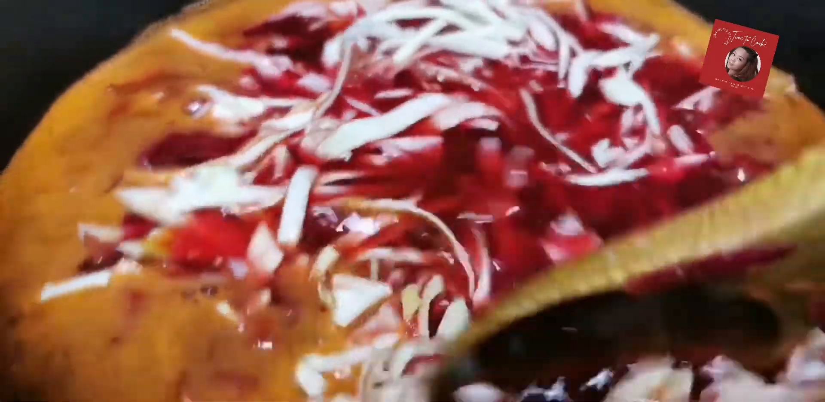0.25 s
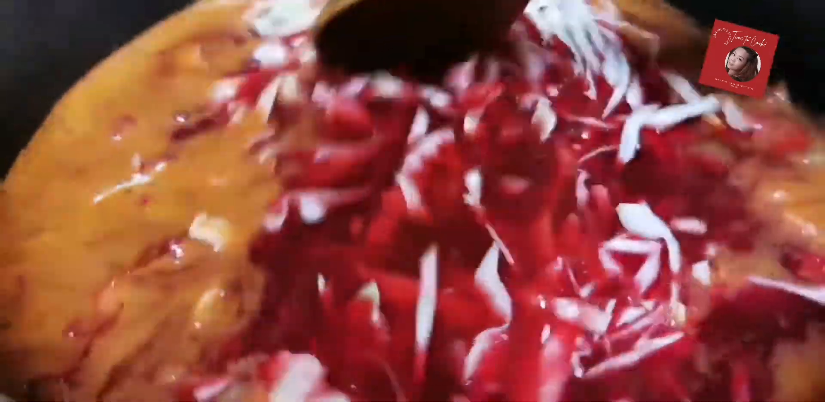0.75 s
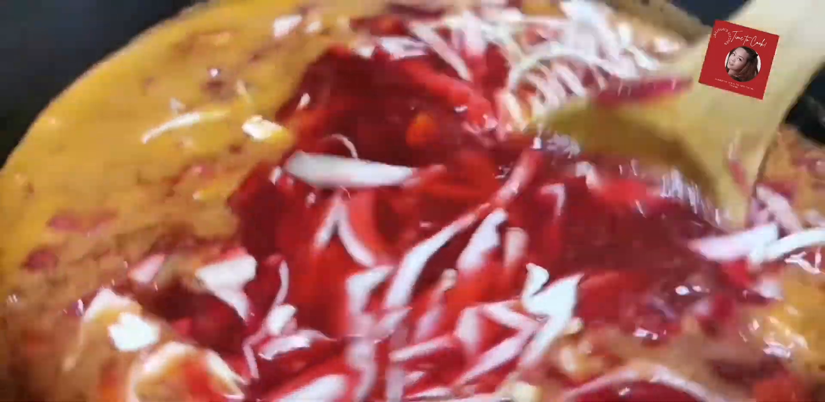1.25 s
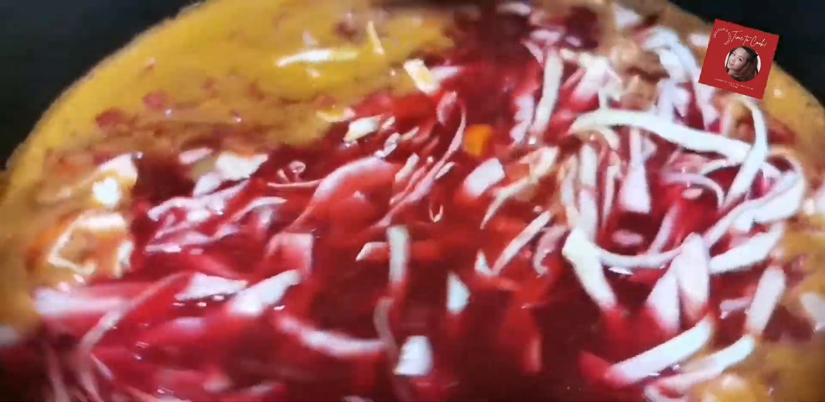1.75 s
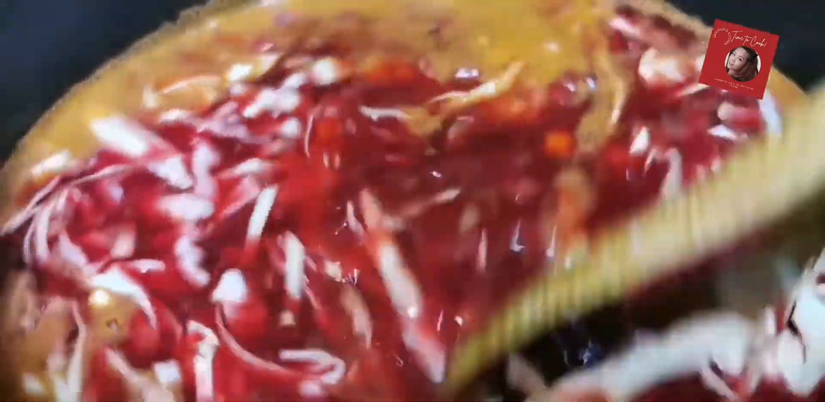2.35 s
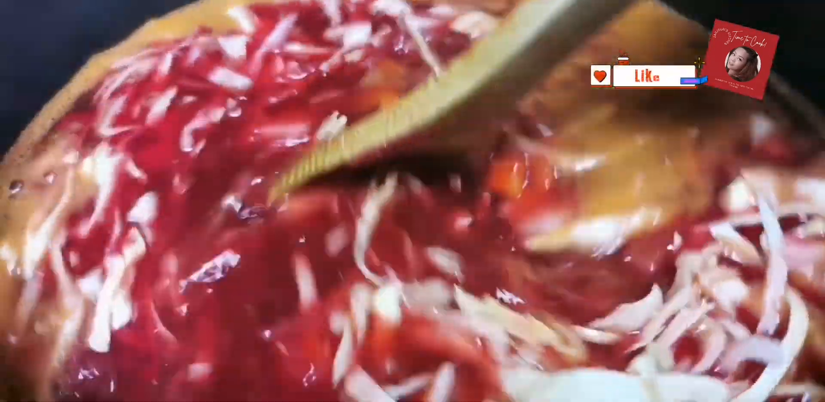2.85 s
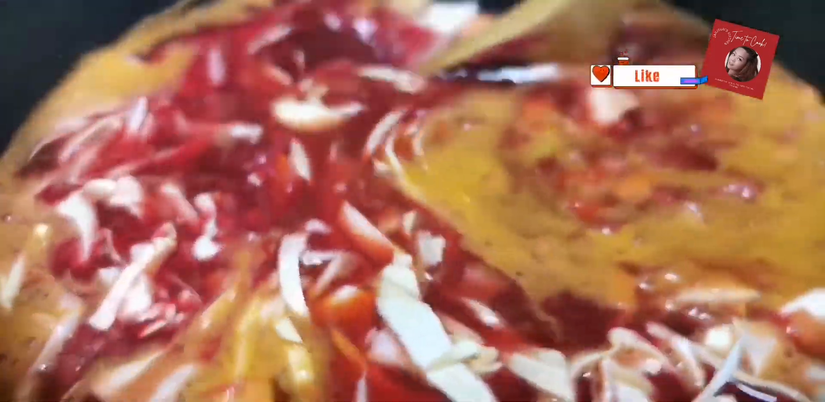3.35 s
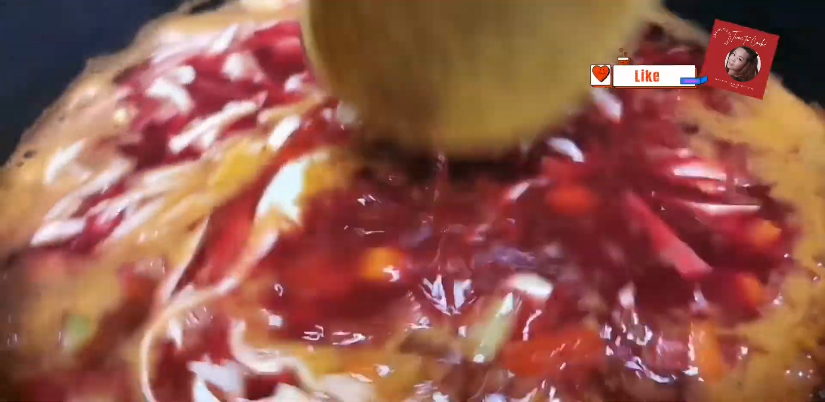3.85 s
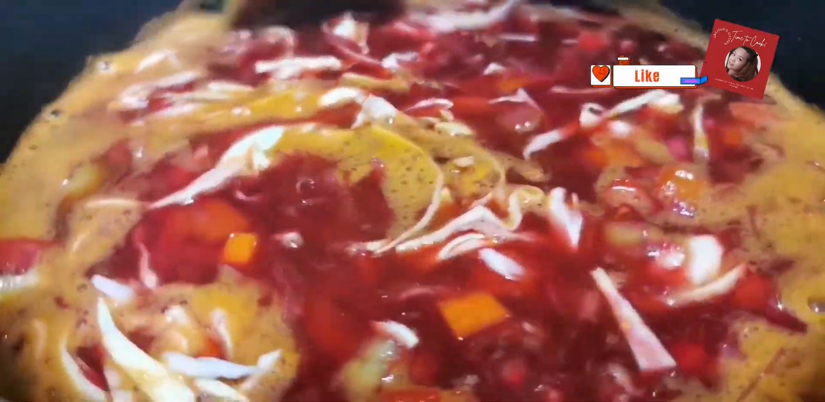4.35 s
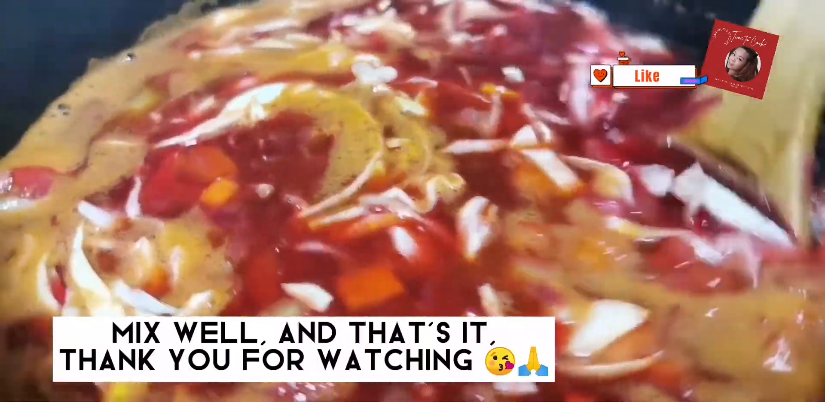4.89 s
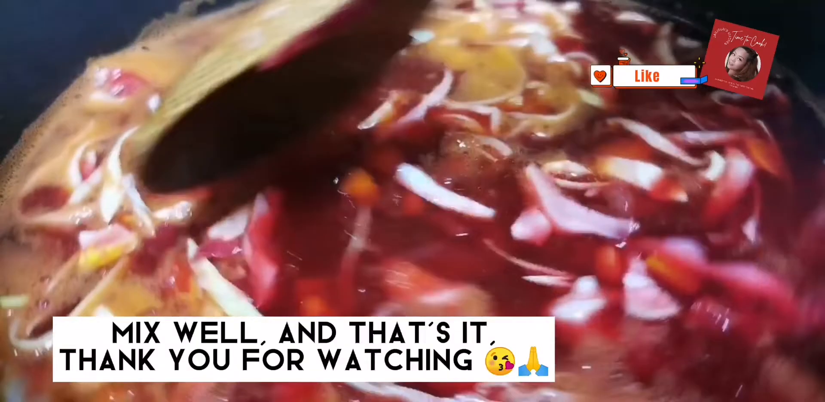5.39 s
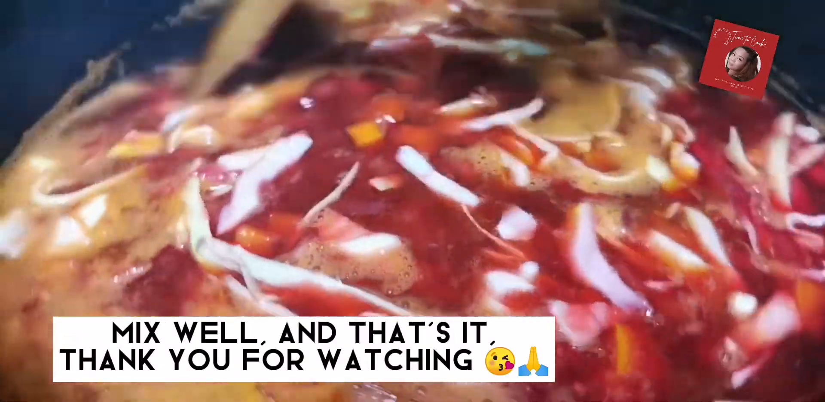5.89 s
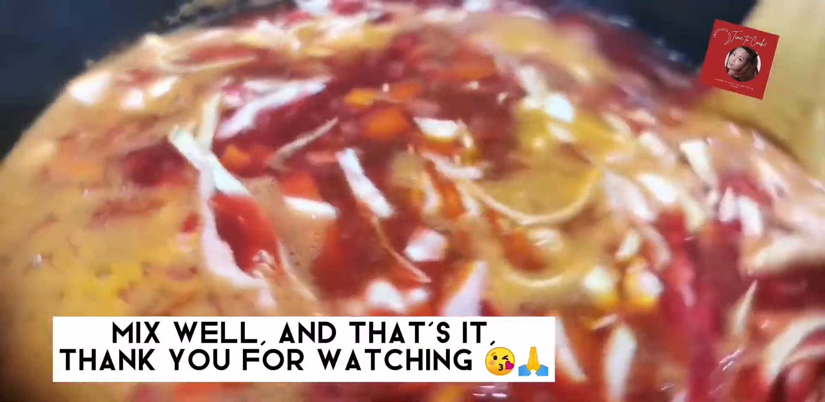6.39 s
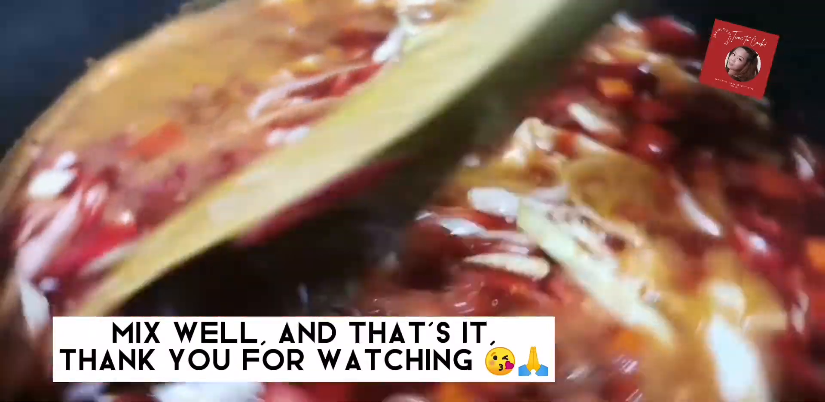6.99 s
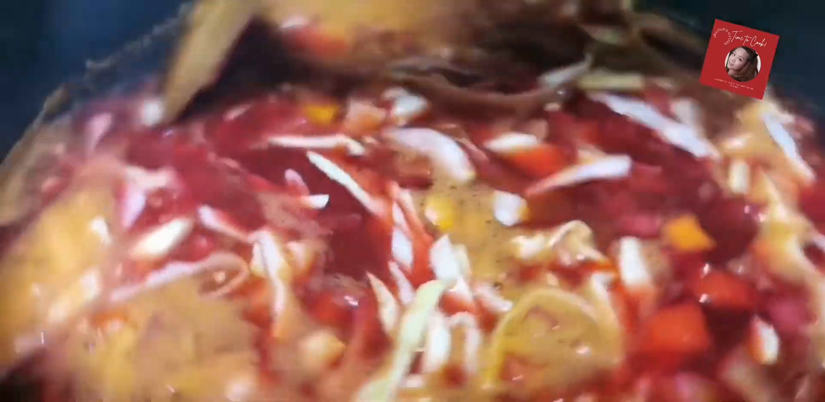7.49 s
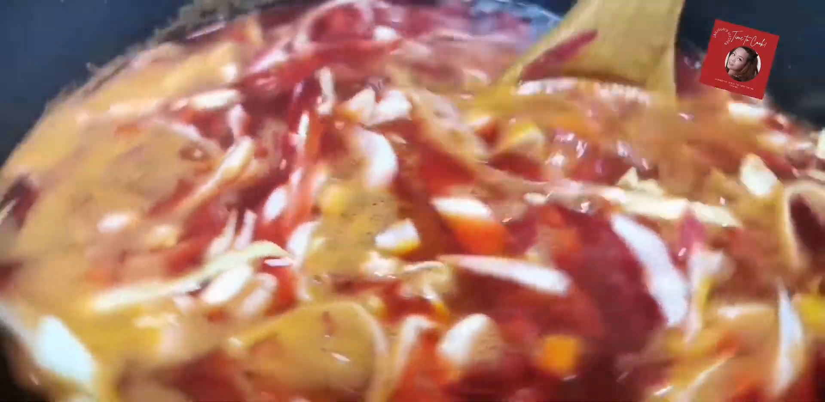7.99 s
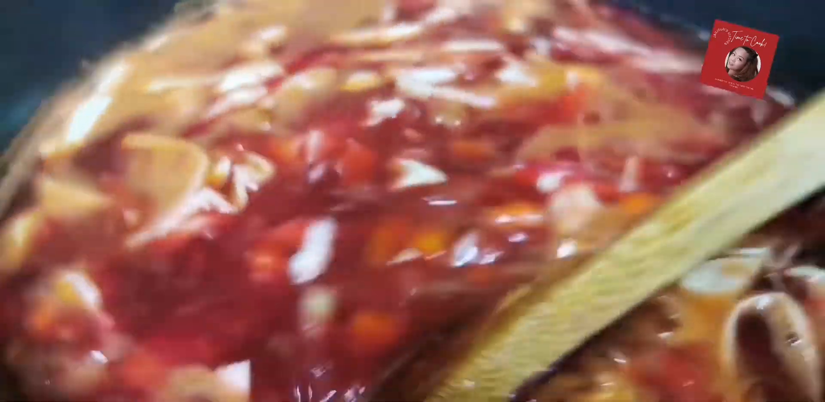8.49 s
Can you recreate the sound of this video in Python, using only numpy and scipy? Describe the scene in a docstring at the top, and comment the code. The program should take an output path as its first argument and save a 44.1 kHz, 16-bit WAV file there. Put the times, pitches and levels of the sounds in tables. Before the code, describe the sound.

Thick soup bubbles low and spits lightly while a wooden spoon stirs it, with dull knocks and short scrapes against the pot.

```python
"""A kitchen stove, close up: a wooden spoon stirs a pot of thick, simmering soup.
The spoon knocks on the pot, drags over its bottom and taps the wall; the soup damps the metal.
Steam bubbles wobble deep down and spit at the surface, the stirred soup heaves, and vegetables
crackle as they are pushed under. One light clink sounds, over a steady hiss with a faint whine."""
import sys
import numpy as np
from scipy import signal
from scipy.fft import rfft, irfft, next_fast_len
from scipy.io import wavfile
from scipy.ndimage import map_coordinates

SR = 44100
rng = np.random.default_rng(int(sys.argv[2]) if len(sys.argv) > 2 else 0)


def waveform_to_disk(signal):
    """Save audio, clipped to [-1, 1], as 16-bit WAV at the path in sys.argv[1]."""
    frames = np.transpose(np.atleast_2d(signal))
    scaled = np.clip(frames, -1, 1) * 32767
    samples = np.round(scaled).astype(np.int16)
    wavfile.write(sys.argv[1], SR, samples)


N = 385424
TOP_HZ = 15600


def amp(db):
    return 10 ** (np.asarray(db) / 20)


def unit_rms(x):
    return x / np.sqrt(np.mean(x ** 2) + 1e-20)


def curve_at(points, hz):
    """Read a (Hz, value) curve on a log frequency axis."""
    freqs, values = np.transpose(points)
    return np.interp(np.log(hz + 1), np.log(freqs), values)


def wobble(rate, size=N):
    """A smooth random curve, rate knots a second."""
    return map_coordinates(rng.standard_normal(int(size * rate / SR) + 4), [np.arange(size) * rate / SR])


def fade(t, t60):
    """Fall by 60 dB every t60 seconds."""
    return np.exp(-np.log(1000) * t / t60)


def add(track, start, sound):
    """Mix a sound in at start seconds."""
    span = track[max(round(start * SR), 0):][:len(sound)]
    span += sound[:len(span)]


def coloured(x, spectrum):
    """x through a (Hz, dB) spectrum, at rms 1."""
    size = next_fast_len(N + SR // 2)
    gain = amp(curve_at(spectrum, np.fft.rfftfreq(size, 1 / SR)))
    return unit_rms(irfft(rfft(x, size) * gain, size)[:N])


def pulse(spectrum, size=4096):
    """The causal pulse that has this (Hz, dB) spectrum."""
    cepstrum = irfft(np.log(amp(curve_at(spectrum, np.fft.rfftfreq(size, 1 / SR)))))
    cepstrum[1:size // 2] *= 2
    cepstrum[size // 2 + 1:] = 0
    return irfft(np.exp(rfft(cepstrum)))[:size // 2]


def spikes(rate, spread_db):
    """Random impulses of uneven size, rate a second."""
    impulses = (rng.random(N) < rate / SR) * rng.choice([-1, 1], N)
    return impulses * amp(spread_db * np.clip(rng.standard_normal(N), -2, 2))


# The room's decay. Each row: frequency in Hz, t60 in seconds.
KITCHEN_DECAY = [(100, 1), (260, 0.35), (700, 0.32), (1800, 0.2), (5000, 0.23)]

def in_kitchen(x, wet_db):
    """A sound and its diffuse tail; the bass lingers longest."""
    hz, t, noise = signal.stft(rng.standard_normal(SR * 3 // 4), SR, nperseg=256)
    tail = signal.istft(noise * fade(t, curve_at(KITCHEN_DECAY, hz)[:, None]), SR, nperseg=256)[1]
    tail *= 1 - np.exp(-(np.arange(len(tail)) / SR / 0.00097) ** 2)  # reflections need a moment
    tail *= amp(wet_db) / np.linalg.norm(tail)
    tail[0] += 1  # the direct sound
    return signal.fftconvolve(x, tail)


# The colour of the hiss. Each row: frequency in Hz, gain in dB.
HISS_EQ = [(500, 14.5), (1000, -5.5), (1700, 0), (2450, 9), (3300, -2.5), (4000, -3.5), (4800, 3),
           (6100, -1.5), (6750, 5), (7800, -3), (9600, -0.5), (10900, 4.5), (12200, -12), (15500, -16)]
# The whine. Each row: pitch in Hz, level in dB.
WHINE_TONES = [(5349, -81), (5987, -79), (6036, -86), (6625, -79.5), (6723, -86), (13818, -95)]

def hiss_and_whine():
    """An even bed of hiss with a few thin, wavering electric tones."""
    t = np.arange(N) / SR
    whine = sum(amp(db + 1.5 * wobble(3)) * np.sin(2 * np.pi * hz * t + 0.8 * wobble(12))
                for hz, db in WHINE_TONES)
    return amp(-61.5) * coloured(rng.standard_normal(N), HISS_EQ + [(TOP_HZ, -2), (17000, -40)]) + whine


# The colours of the broth and the rumble under it. Each row: frequency in Hz, gain in dB.
BROTH_EQ = [(110, -10), (200, -8.5), (268, 1.5), (320, -4.5), (370, -13.5), (490, -9), (700, -12),
            (1000, -15), (1800, -20), (4000, -41)]
RUMBLE_EQ = [(12, -8), (25, 2.5), (42, -1.5), (60, -13.5), (80, -2), (105, -8.5), (130, -2.5), (175, -15),
             (300, -37)]

def simmer(churn_db=6, spread_db=14):
    """Steam bubbles wobble deep in the thick soup, each rising in pitch, over churn and a low rumble."""
    bubbles, t = np.zeros(N), np.arange(SR // 12) / SR
    for when, smallness, strength in rng.random((1400, 3)):
        hz = 200 * 4.614 ** smallness
        envelope = np.exp(-t * hz / 5) * (1 - np.exp(-t * hz))
        chirp = np.sin(2 * np.pi * hz * t * (1 + 1.4 * t))
        add(bubbles, when * N / SR, amp(spread_db * strength) * envelope * chirp)
    churn = coloured(rng.standard_normal(N), [(2000, 2), (5000, -27)])
    broth = coloured(unit_rms(bubbles) + amp(churn_db) * churn, BROTH_EQ)
    rumble = coloured(rng.standard_normal(N), RUMBLE_EQ) * amp(0.66 * wobble(9))
    return amp(-59.5) * broth + amp(-54) * rumble


# Low heaves. Each row: start in seconds, level at the crest in dB.
SOUP_HEAVES = [(2.82, -47), (6.54, -47), (8.07, -45.5)]

def heaves(rise_s=0.043):
    """A mass of soup shoved by the spoon: a low swell that comes fast and settles."""
    out, t = np.zeros(N), np.arange(SR // 2) / SR
    swell = t / rise_s * np.exp(1 - t / rise_s)
    bass_eq = [(15, -9.5), (40, 1.5), (80, -7.5), (150, -21.5), (300, -47.5)]
    for start, db in SOUP_HEAVES:
        add(out, start, amp(db) * swell * coloured(rng.standard_normal(N), bass_eq)[:len(t)])
    return out


# Vegetables going under. Each row: start in seconds, flare depth (a unit adds about 0.8 dB at the crest).
VEGETABLE_DUNKS = [(0, 6.5), (1.6, 7), (3.32, 2)]

def crackle(rise_s=0.026, settle_s=0.49):
    """A fine wet crackle that flares each time the spoon pushes fresh vegetables under."""
    fizz_eq = [(1000, -12), (4000, -12), (11000, 5), (15000, 1), (17000, -22)]
    fizz = coloured(spikes(rate=900, spread_db=2), fizz_eq)
    level_db = -70 + 2 * wobble(7)
    for start, depth in VEGETABLE_DUNKS:
        age = np.maximum(np.arange(N) / SR - start, 0)
        level_db += depth * (1 - np.exp(-age / rise_s)) * np.exp(-age / settle_s)
    return amp(level_db) * fizz


# The featured pops. Each row: start in seconds, peak in dB, pitch in Hz.
SURFACE_POPS = [(.0613, -43, 11100), (.1882, -45, 3800), (.2573, -42, 5500), (0.3105, -42, 10500),
                (0.613, -41, 13000), (.826, -42, 13500), (1.637, -44, 4500), (1.7727, -43, 10700),
                (2.368, -43, 10000), (2.964, -40.5, 6500), (4.7376, -45, 14500), (7.0479, -42, 11900)]

def pops(thin_out_s=1.2, spread_db=4.5):
    """Thin bubble films burst at the surface; random lesser spits come ever more rarely."""
    out, t = np.zeros(N), np.arange(SR // 50) / SR
    spits = [(-thin_out_s * np.log(1 - wait), -45 + spread_db * (2 * strength - 1), 12000)
             for wait, strength in rng.random((16, 2))]
    for start, db, hz in SURFACE_POPS + spits:
        film = pulse([(hz / 4, -16), (hz, 0), (hz * 2, -8)])
        pop = signal.fftconvolve(rng.standard_normal(len(t)) * fade(t, 0.012), film)
        add(out, start, amp(db) * pop / abs(pop).max())
    return out


# A small hard object's ring. Each row: pitch in Hz, gain in dB, t60 of the tail in seconds.
CLINK_MODES = [(1010, -10, 0.12), (2440, -11, 0.069), (2440, -6.5, 0.029), (4680, -4, 0.061),
               (4750, -6, 0.12), (5610, -6.5, 0.13), (6400, -13.5, .1), (9940, -14, .08), (14500, -5, .16),
               (15340, -9, .14)]

def clink(start=1.4725, gain_db=-37):
    """A light, bright clink: a short chatter of contact, then its modes fade."""
    out, t = np.zeros(N), np.arange(SR // 4) / SR
    ring = np.zeros(len(t))
    for hz, db, t60 in CLINK_MODES:
        rattle = 1.02 * wobble(400, size=len(t))  # blurs the pitch
        ring += amp(db) * np.sin(2 * np.pi * hz * t + rattle) * (fade(t, 0.018) + 0.26 * fade(t, t60))
    chatter = 0.21 * rng.standard_normal(len(t)) * fade(t, 0.062)
    attack = 1 - np.exp(-t / 0.0011)
    add(out, start, in_kitchen(amp(gain_db) * attack * (ring + chatter), wet_db=-2))
    return out


# Light taps. Each row: start in seconds, peak before the room in dB, relative treble in dB.
WALL_TAPS = [(.609, -43.5, -15), (4.966, -44.5, -16), (5.033, -39, -20), (5.093, -45, -19),
             (5.133, -42.5, -15), (5.27, -46, -19), (5.9204, -41, -8), (6.403, -38.5, -19),
             (6.474, -37.5, -3), (7.973, -36, -22), (8.028, -40, -20), (8.073, -36, -15)]
# The colour of the wood. Each row: frequency in Hz, gain in dB.
WOOD_EQ = [(300, -21), (900, -9.5), (1350, -3.5), (2100, 1.5), (2700, -4), (3600, -7), (5500, -1),
           (9000, -16), (15000, -32)]

def taps():
    """The spoon's edge ticks against the pot wall; the wet taps are duller."""
    out, t = np.zeros(N), np.arange(SR // 50) / SR
    wood = pulse(WOOD_EQ)
    for start, db, treble_db in WALL_TAPS:
        burst = rng.standard_normal(len(t)) * fade(t, 0.01)
        contact = signal.fftconvolve(burst, pulse([(2700, 0), (4500, treble_db + 2.5)]))
        tap = signal.fftconvolve(contact, wood)
        add(out, start, in_kitchen(amp(db) * tap / abs(tap).max(), wet_db=-5))
    return out


# Drags over the bottom. Each row: start and length in seconds, level in dB, final resonance in Hz.
SPOON_STROKES = [(4.6, 0.13, -52.5, 910), (6.109, 0.31, -43.5, 1480), (7.722, 0.047, -45.5, 510),
                 (7.82, .19, -43, 1500)]
# The colour of the friction. Each row: frequency in Hz, gain in dB.
DRAG_EQ = [(100, -25), (260, 8.5), (460, 10), (600, 0.5), (760, 5), (1060, -11), (1270, -1), (1430, -9),
           (1680, -1.5), (2100, -10.5), (2600, -4), (3300, -14), (4400, -17), (12000, -22)]

def scrapes(start_hz=480, resonance_db=14, width_octaves=0.64, swell_db=7.5, judder_db=1.7):
    """Tiny slips of wood on metal: a dull drag swells as its resonance climbs to a rasp near the wall."""
    out, t = np.zeros(N), np.arange(SR // 2) / SR
    for start, length, db, end_hz in SPOON_STROKES:
        slips = coloured(spikes(rate=2200, spread_db=1.5), DRAG_EQ)[:len(t)]
        hz, when, spectra = signal.stft(slips, SR, nperseg=512)
        climb = np.minimum(when / length / 0.79, 1) ** 1.83  # speeds up, then holds
        centre_hz = start_hz * (end_hz / start_hz) ** climb
        distance = np.log2((hz[:, None] + 1) / centre_hz) / width_octaves
        resonance = amp(resonance_db * np.exp(-distance ** 2))
        rasp = unit_rms(signal.istft(spectra * resonance, SR, nperseg=512)[1][:len(t)])
        pressure = np.minimum(t / 0.021, 1) * amp(swell_db * np.minimum(t / length - 1, 0))
        lift = fade(np.maximum(t - length, 0), t60=0.14)
        add(out, start, pressure * lift * amp(db + judder_db * wobble(66, size=len(t))) * rasp)
    return out


# Spoon knocks. Each row: start in seconds; gain, boom of the bottom and hardness, all in dB;
# then the struck spot's clack: pitch in Hz, gain in dB, t60 in seconds.
SPOON_KNOCKS = [(4.5072, -17, -3, .5, 3240, -8.5, 0.0069), (6.0474, -14, -2, -7, 2430, -12, 0.017),
                (6.526, -15.5, -8, -25, 428, -7.5, 0.039), (7.338, -11, 2, -2.5, 694, -2.5, 0.032),
                (7.665, -18.5, 3.5, -3, 1980, -13.5, 0.041), (8.065, -42.5, 7.5, -32, 250, 7, 0.1)]
# The voice of the filled pot. Each row: pitch in Hz, gain in dB, t60 in seconds.
POT_MODES = [(75.6, -23, 0.75), (157.9, -9.5, 0.19), (319, -1.5, 0.021), (328.6, -16, 0.092),
             (515, -2, 0.016), (511, -26, 0.34), (606, -15, 0.12), (678, -5.5, 0.014), (751, -24.5, 0.14),
             (1284, -7, 0.01), (2037, -11.5, 0.013), (2610, -10, 0.0084), (3140, -16, 0.0071),
             (6440, -24.5, 0.0026)]

def knocks(long_t60=0.05):
    """Each blow rings the pot; a soft one, cushioned by vegetables, loses its top."""
    out, t = np.zeros(N), np.arange(SR // 2) / SR
    mode = lambda hz, db, t60: amp(db) * np.sin(2 * np.pi * hz * t) * fade(t, t60)
    for start, db, boom_db, hard_db, *clack in SPOON_KNOCKS:
        modes = [(t60, (-1) ** k * mode(hz, mode_db + rng.normal(0, 1), t60))
                 for k, (hz, mode_db, t60) in enumerate(POT_MODES)]
        thud = sum(wave for t60, wave in modes if t60 < long_t60) + mode(*clack)
        ring = sum(wave for t60, wave in modes if t60 >= long_t60)
        crack = amp(-25.5) * rng.standard_normal(len(t)) * fade(t, 0.022)
        contact = pulse([(40, boom_db - 18.5), (110, boom_db + 0.5), (165, boom_db), (235, -5), (320, 1),
                         (680, -3), (1200, hard_db), (7000, hard_db), (14000, hard_db - 18)])
        # the sharp thud scatters round the kitchen; the long modes swell and ring close by
        blow = in_kitchen(thud + crack, wet_db=-6)[:len(t)] + ring * (1 - np.exp(-t / 0.0052))
        add(out, start, amp(db) * signal.fftconvolve(blow, contact))
    return out


def scene():
    """Spoon, soup and background, mixed in mono."""
    spoon = knocks() + scrapes() + taps()
    return (spoon + pops() + crackle() + clink() + simmer() + heaves() + hiss_and_whine())[None]


def record(dry):
    """A brick-wall low-pass at TOP_HZ."""
    size = next_fast_len(N + SR // 2)
    passband = np.fft.rfftfreq(size, 1 / SR) < TOP_HZ
    return irfft(rfft(dry, size) * passband, size)[:, :N]


dry = scene()
out = record(dry)
waveform_to_disk(out)
```